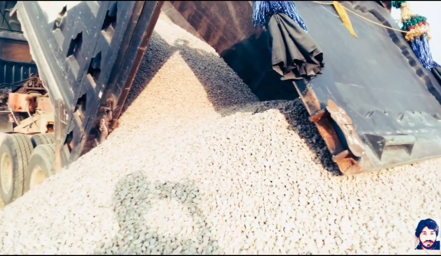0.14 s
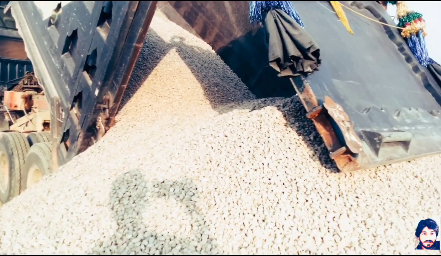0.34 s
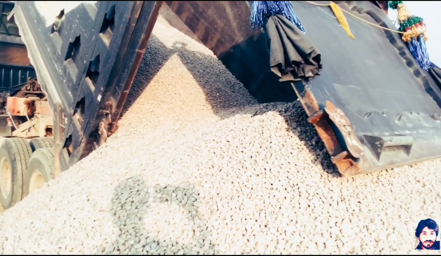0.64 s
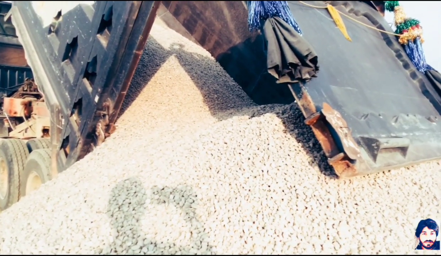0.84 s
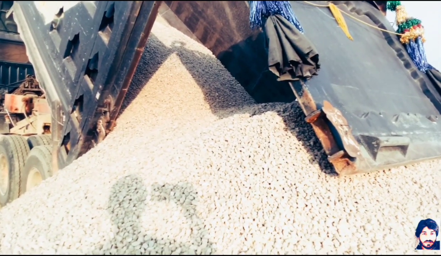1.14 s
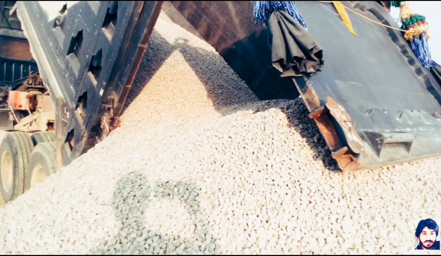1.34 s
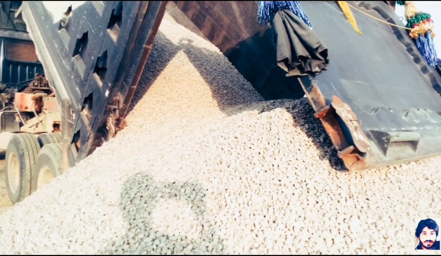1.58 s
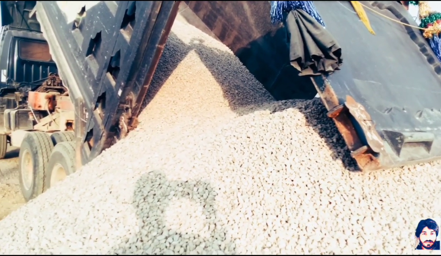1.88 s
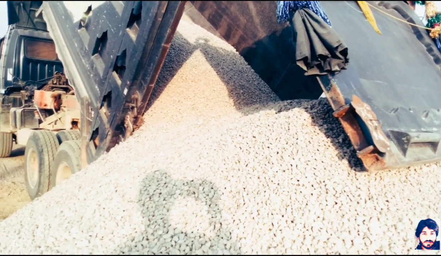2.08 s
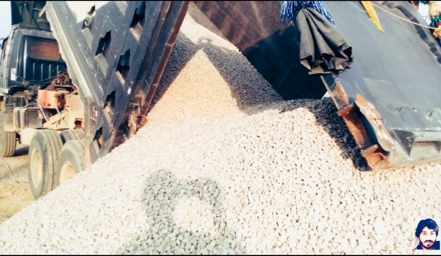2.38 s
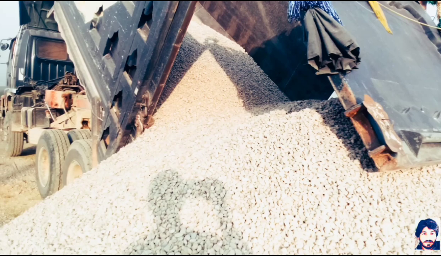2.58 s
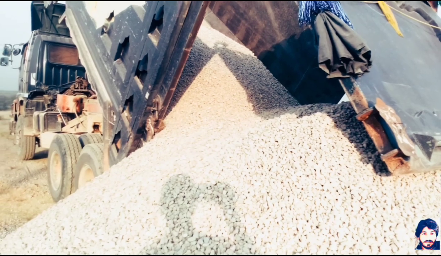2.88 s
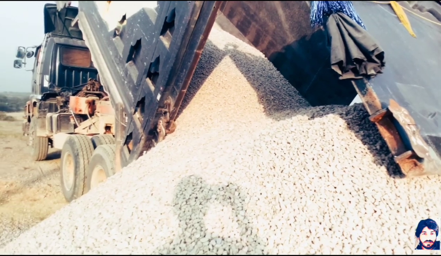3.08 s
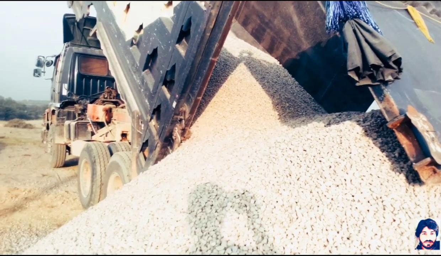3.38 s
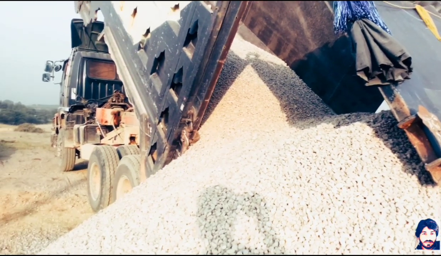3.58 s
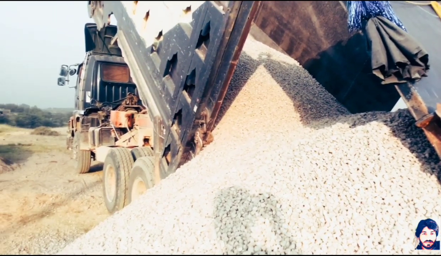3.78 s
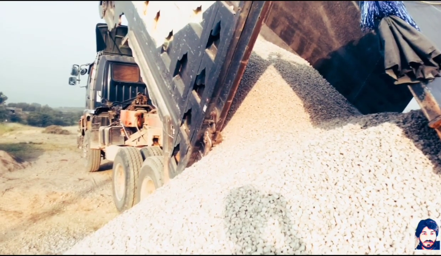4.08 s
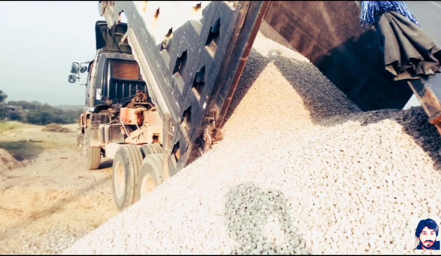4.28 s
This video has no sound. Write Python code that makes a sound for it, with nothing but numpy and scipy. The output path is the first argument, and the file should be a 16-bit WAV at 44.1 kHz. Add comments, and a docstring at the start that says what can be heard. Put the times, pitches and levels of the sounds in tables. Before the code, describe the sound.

From 0 s crushed stone is already running off a raised steel truck bed onto a heap, close and bright: countless tiny ringing grains over a fizzy hiss, with pebble clicks and sharp snaps. A nearby diesel idles throughout, its metallic knock repeating in an uneven pattern nearly four times a second, with quicker ticks between, soft exhaust puffs and a wavering low hum. The flow surges at about 0.2-0.7 s and again near 1.3 s, then thins somewhat. Small crackling slides burst often from 0.2 s. Loads drum on the hollow bed, strongly near 0.2, 1.3 and 2.65 s; brief squeaks chirp throughout, clustering after 4 s. Steel pings at 1.65, 2.25, clearest there, and 2.74 s. Stone dips near 3.85 s, then a crisp slide clicks at 4.06 s. The engine gradually weakens while the stone continues to the cut at about 4.4 s. Dry open air, little deep bass.

```python
"""Crushed stone trickles off a raised steel bed onto a pile in the open air, near an idling six-cylinder diesel.
From the start the contacts of the engine ring its block in a fixed pattern, over exhaust puffs and a low hum.
The stream is many tiny ringing grains over hiss; loads drum on the hollow bed, and stones squeak, snap and knock.
Small slides of stone, made of crackling noise, soon begin to swell and die.
Later a few single stones make the steel ping, while the engine knock slowly grows fainter."""
import sys
import numpy as np
from scipy import signal
from scipy.fft import rfft, irfft, next_fast_len
from scipy.io import wavfile

SR = 44100
rng = np.random.default_rng(int(sys.argv[2]) if len(sys.argv) > 2 else 0)


def field_ratio(decibels):
    """Amplitude ratio for a level in dB (20 dB per decade); scalars and array-likes work."""
    return 10 ** (np.asarray(decibels, dtype=float) / 20)


def waveform_to_disk(signal):
    """Save audio, clipped to [-1, 1], as 16-bit WAV at the path in sys.argv[1]."""
    frames = np.transpose(np.atleast_2d(signal))
    scaled = np.clip(frames, -1, 1) * 32767
    samples = np.round(scaled).astype(np.int16)
    wavfile.write(sys.argv[1], SR, samples)


N = 195451

# The flow of stone. Each row: time in seconds, strength in dB, extra grit in dB.
FLOW_CURVE = [(0, -2, 1), (.15, 3, 0), (.31, 2.5, 0), (.68, 1.5, 0), (1.08, -1.5, -1), (1.29, 3, -2),
              (1.5, 2, 0), (1.78, 1, 2), (2.04, -.5, 2), (2.4, -2, 0), (2.65, .5, -1), (2.95, -1, 0),
              (3.3, 0, 3), (3.5, 1, 0), (3.85, -4, -1), (4.1, 1.2, 1), (4.43, -1, 0)]
# How each part of the stone sound, and the bed under it, answers the flow.
# Each holds: level in dB, share of the strength, share of the grit, thinning in dB per second (below 0: growing).
BIG_STONES = (-44.9, .9, .01, .2)
SMALL_STONES = (-44, 1.1, -.3, .9)
FINE_STONES = (-35.8, .3, .4, .65)
FIZZ_STONES = (-57.5, .2, 1.1, .1)
NARROW_STONE_BAND = (-58, .3, .5, -2.9)   # stone sound near 7.5 kHz that grows as the microphone turns
BED_CLATTER = (-59.5, .5, .01, .9)
BED_BOOM = (-68.5, .8, -.5, -.2)
# Colour of the stone sound as the microphone hears it. Each row: frequency in Hz, gain in dB.
STONE_COLOUR = [(1400, -7.5), (2000, -16), (2500, -10), (3000, -6.5), (4200, -2), (5000, -3.5),
                (5800, -1.5), (6300, -8), (6630, -14.5), (6950, -7), (7600, -4), (9000, -9), (10500, -11),
                (12500, -20), (13900, -25), (14800, -6.5), (15400, -2)]
# Small slides, before the colour. Each row: start in seconds, rms level at the start in dB,
# centre in Hz, seconds to fall by 20 dB.
SLIDE_EVENTS = [(.2104, -28.5, 5470, .045), (.309, -34.5, 4360, .032), (.4208, -35, 5330, .24),
                (.512, -32.5, 4400, .032), (.5802, -26, 8100, .047), (.6536, -33, 4380, .08),
                (.7323, -32.5, 2900, .042), (.8043, -32.5, 5900, .07), (.9728, -34.5, 4100, .032),
                (1.0004, -36.5, 4760, .043), (1.1562, -29, 5330, .056), (1.1984, -34.5, 4950, .068),
                (1.3214, -30, 5070, .046), (1.6273, -38.5, 4160, .1), (1.7454, -37.5, 3900, .08),
                (1.8078, -35, 5370, .074), (2.0894, -27, 4900, .031), (2.2656, -26, 5140, .059),
                (2.4137, -32, 4840, .032), (2.5322, -35, 4200, .12), (2.583, -29.5, 7000, .027),
                (2.615, -35.5, 3960, .1), (2.6606, -32.5, 4160, .043), (2.7048, -34.5, 4030, .062),
                (2.86, -35, 2870, .1), (2.943, -36, 4500, .04), (3.1534, -31.5, 7060, .1),
                (3.16, -37, 3000, .08), (3.353, -33.5, 3970, .032), (3.3774, -30.5, 7300, .03),
                (3.5431, -39, 4400, .06), (3.719, -39, 4120, .24), (4.0604, -25, 4600, .03),
                (4.069, -30, 4200, .06), (4.3666, -33.5, 5200, .051)]
# Heavier loads landing on the hollow bed. Each row: time in seconds, clatter in dB, boom in dB.
LOAD_LANDINGS = [(.02, -62, -51), (.14, -58, -53), (.22, -47, -63), (.32, -48, -60), (.43, -55, -58),
                 (.48, -53, -60), (.62, -60, -55), (.76, -52, -54), (.83, -56, -64), (.94, -56, -62),
                 (1.02, -61, -60), (1.17, -57, -64), (1.27, -53, -60), (1.33, -47, -53), (1.43, -52, -56),
                 (1.57, -52, -62), (1.63, -53, -66), (1.76, -55, -64), (1.84, -55, -64), (2.01, -57, -66),
                 (2.08, -56, -62), (2.27, -55, -58), (2.62, -47, -58), (2.67, -46, -56), (2.75, -51, -55),
                 (2.81, -56, -62), (2.87, -56, -54), (2.95, -62, -58), (3.18, -50, -58), (3.37, -53, -68),
                 (3.43, -52, -60), (3.5, -57, -56), (3.57, -58, -66), (3.76, -60, -60), (4.05, -61, -57),
                 (4.2, -64, -56), (4.33, -66, -58)]
# Modes of the steel bed. Each row: frequency in Hz, relative level in dB, time to fall by 60 dB in seconds.
BED_MODES = [(1849, -5.5, .04), (2255, -1, 0.045), (2714, 0, 0.065), (2890, 2, 0.035)]
# Lone stones snapping. Each row: first touch in seconds, usual peak in dB.
SNAP_EVENTS = [(0.124, -28), (0.2133, -31), (0.2712, -32), (0.4453, -29), (0.58, -28), (0.5924, -25),
               (0.6513, -30), (0.7318, -31), (0.7845, -23), (0.8048, -31), (0.8208, -28), (.8965, -31),
               (0.9895, -28), (1.0025, -31), (1.065, -33), (1.1352, -29), (1.1548, -30), (1.24, -32),
               (1.46, -30), (1.7932, -29), (1.8396, -32), (2.2532, -27), (2.4208, -28), (2.562, -32),
               (2.7925, -24), (2.8001, -26), (2.8126, -32), (3.0658, -31), (3.1526, -30), (3.1995, -31),
               (3.3482, -32), (3.422, -32), (3.4529, -31), (3.6136, -27), (3.8146, -31), (4.0341, -30),
               (4.0606, -32), (4.0777, -28), (4.2541, -32), (4.3339, -26), (4.3464, -30), (4.3654, -31),
               (4.4013, -30)]
# Ringing of a chip of stone. Each row: frequency in Hz, relative level in dB, time to fall by 60 dB in seconds.
CHIP_MODES = [(6000, -9, .004), (7600, -2, .005), (8700, -1, .004), (10000, -3, .003), (12200, -8, .003)]
# Big stones knocking on the bed. Each row: time in seconds, rough peak in dB.
KNOCK_BLOWS = [(0.2124, -39), (0.3097, -35), (0.6469, -43), (0.7312, -39), (1.1199, -45), (1.276, -39),
               (1.3124, -38), (1.3833, -40), (1.6297, -38), (2.2543, -42), (2.6434, -32), (4.365, -42)]
# Dull thuds on the bed. Each row: time in seconds, rough peak in dB.
THUD_BLOWS = [(0.189, -55), (0.734, -52), (1.02, -49), (1.173, -53), (1.35, -45), (2.313, -51),
              (2.366, -53), (2.411, -56), (2.657, -46), (2.854, -50), (2.937, -50), (3.173, -50),
              (3.975, -54), (4.201, -52)]
# Ringing of a thud. Each row: frequency in Hz, relative level in dB, time to fall by 60 dB in seconds.
DULL_MODES = [(590, -4, .08), (690, -8, .06)]
# Pebbles clicking on the heap. Each row: time in seconds, rough peak in dB.
PEBBLE_BLOWS = [(0.2109, -28), (0.5127, -27), (0.5766, -30), (0.6539, -29), (0.7317, -26), (0.8056, -27),
                (0.8609, -30), (0.8809, -30), (0.9732, -33), (1.1204, -31), (1.1558, -25), (1.2635, -31),
                (1.3209, -28), (1.3823, -30), (1.5723, -32), (1.6282, -29), (1.7439, -31), (1.7943, -30),
                (2.0268, -34), (2.0892, -27), (2.2528, -27), (2.2707, -27), (2.4129, -32), (2.5331, -30),
                (2.582, -32), (2.6155, -30), (2.6604, -28), (2.7033, -32), (2.8609, -33), (2.9467, -34),
                (3.1467, -32), (3.252, -36), (3.3523, -33), (3.5428, -30), (3.7199, -32), (3.7928, -36),
                (4.0597, -25), (4.1415, -35), (4.2298, -34), (4.3655, -32)]
# Ringing of a pebble. Each row: frequency in Hz, relative level in dB, time to fall by 60 dB in seconds.
CLICK_MODES = [(3300, -2, .012), (4050, 0, .012), (4900, -1, .009), (5650, 0, .008)]
# Stones that strike one clear mode of the steel. Each row: time in seconds, rough peak in dB.
PING_EVENTS = [(1.645, -48), (2.2535, -30), (2.738, -42.5)]
# Stones squeaking along the steel. Each row: start in seconds, level in dB, first pitch in Hz,
# last pitch in Hz, length in seconds.
SQUEAK_EVENTS = [(0.043, -45, 4070, 4020, 0.027), (.246, -43, 4120, 4100, .03),
                 (0.308, -43, 4360, 4330, 0.043), (0.478, -44, 4340, 4320, 0.05),
                 (0.653, -44, 4370, 4370, .035), (0.855, -43, 4070, 4130, 0.04),
                 (.893, -44, 4330, 4380, .025), (.935, -47, 4050, 4020, .045),
                 (1.625, -39.5, 4100, 4290, 0.042), (1.745, -45, 3980, 3950, 0.016),
                 (1.807, -39, 5750, 5640, 0.014), (1.868, -43.5, 3680, 3980, .025),
                 (2.66, -43, 4000, 4150, .025), (2.705, -46.5, 3880, 3600, 0.022),
                 (2.943, -47, 4050, 4020, .025), (2.852, -51, 2750, 2900, .05),
                 (3.35, -45, 4100, 4080, .014), (3.372, -52, 2700, 2720, .07),
                 (3.437, -47, 4580, 3700, .06), (3.494, -49, 2700, 2740, 0.016),
                 (3.54, -48, 3680, 3800, 0.034), (4.058, -41, 3660, 3680, .022),
                 (4.095, -50, 3740, 3780, .05), (4.136, -42, 4120, 4110, 0.052),
                 (4.165, -50, 3680, 3640, .04), (4.19, -46, 4170, 4150, .048),
                 (4.226, -48, 3500, 3620, 0.05)]
# The idle speed hunts a little. Each row: time in seconds, engine cycles done, counted at the hardest knock.
ENGINE_TURNS = [(-.1469, -1), (.1225, 0), (.6606, 2), (1.7331, 6), (1.9995, 7), (3.3464, 12), (3.6137, 13),
                (4.6893, 17)]
# Ringing of the engine block. Each row: frequency in Hz, time to fall by 60 dB in seconds.
BLOCK_MODES = [(1026, 0.12), (1107, 0.041), (1181, 0.046), (1258.3, 0.071), (406.4, 0.037), (598.8, 0.12),
               (1568, 0.11), (950, .05)]
# Contacts in one cycle. Each row: share of the cycle, dB into each of the first four modes of the block
# (four columns), dB into every other mode. All are relative to the knock level.
CYCLE_CONTACTS = [(-.0071, -7.5, -4, -3, -1, -30), (.0197, -35, -30, -1, -9, -30),
                  (.0364, -15, -35, -14, -12, -23), (.148, -30, -18, -14, -6, -24.5),
                  (.195, -25, -12, -13, -12, -24), (.247, -17, -17, -15, -7.5, -30),
                  (.315, -14, -22, -22, -8, -30), (.352, -15, -9, -11, -4, -18),
                  (.405, -30, -12, -12, -16, -30), (.4933, -30, -7, -30, -7, -28.5),
                  (.53, -15, -9, 2.5, -14, -22), (.5632, -18, -8, -12, -13, -30),
                  (0.645, -17, -18, -14, -10.5, -28), (.695, -28, -14, -17, -20, -40),
                  (.735, -30, -30, -22, -13, -40), (0.855, -26, -45, -20, -11, -44.5)]
# Rattle of gears in each mode of the block, before it follows the shaking: one level in dB per mode.
GEAR_RATTLE_DB = [-67, -64, -63.5, -53.5, -69.5, -69.5, -65, -65]
# Direction in which each mode swings: one sign per mode.
MODE_SIGNS = [1, -1, -1, 1, 1, 1, 1, 1]
# Exhaust puff of each cylinder. Each row: share of the cycle, usual drive in dB.
CYLINDER_PUFFS = [(0.06, -57), (.22, -56), (0.41, -57), (0.56, -46), (0.725, -48.5), (.9, -57)]
# Spectrum of the engine rumble. Each row: frequency in Hz, relative level in dB per Hz.
RUMBLE_SPECTRUM = [(30, -10), (60, -11), (105, -4), (150, -5), (240, -8.5), (330, -10), (420, -15),
                   (640, -21), (790, -18), (930, -10), (1350, -7), (1800, -17.5), (2400, -42), (4000, -62)]
# The hum swells briefly. Each row: time in seconds, peak of the added hum in dB.
HUM_HUMPS = [(.04, -57), (.3, -58), (.37, -54), (.47, -56), (.6, -60), (.8, -60), (1.08, -58), (1.14, -57),
             (1.45, -60), (1.6, -54), (1.75, -59), (1.87, -52), (2.07, -54), (2.17, -54), (2.58, -58),
             (2.73, -61), (2.84, -61), (3.0, -55), (3.27, -55), (3.8, -59), (4.07, -60)]


def rms_one(x):
    """Scale a sound to an rms of 1."""
    return x / np.sqrt(np.mean(x ** 2) + 1e-20)


def band(x, low_hz, high_hz, order=2):
    """Keep only the sound between two frequencies."""
    return signal.sosfilt(signal.butter(order, [low_hz, high_hz], "band", fs=SR, output="sos"), x + 1e-18)


def ring(clicks, hz, t60):
    """A two-pole resonator: a unit click starts a dying sine of height about 1."""
    r = field_ratio(-60 / (t60 * SR))
    w = 2 * np.pi * hz / SR
    return signal.lfilter([0, np.sin(w)], [1, -2 * r * np.cos(w), r * r], clicks + 1e-18)


def coloured(x, points):
    """Filter a sound with the gains of a table, joined along log frequency."""
    size = next_fast_len(N)
    hz, db = np.transpose(points)
    bin_hz = np.arange(size // 2 + 1) * SR / size
    gain = field_ratio(np.interp(np.log(bin_hz + 1), np.log(hz), db))
    return irfft(rfft(x, size) * gain, size)[:N]


def drift(rate):
    """A slow random wander of rms about 1: noise smoothed by two equal poles at rate Hz."""
    r = np.exp(-40 * np.pi * rate / SR)   # computed at every 20th sample
    noise = rng.standard_normal(N // 20 + 2002)
    slow = signal.lfilter([1], [1, -2 * r, r * r], noise)[2000:]
    return np.interp(np.arange(N) / 20, np.arange(len(slow)), rms_one(slow))


def swells(s, db, rise_s, fall_s):
    """Power of humps that build up to their peak and die away exponentially."""
    late = np.arange(0, N, 32)[:, None] / SR - np.array(s)   # computed at every 32nd sample
    distance = np.where(late < 0, -late / rise_s, late / fall_s)
    power = (field_ratio(2 * np.array(db)) * np.exp(-2 * distance)).sum(axis=1)
    return np.interp(np.arange(N) / 32, np.arange(len(power)), power)


def clumps(spread_db):
    """Stones arrive in handfuls: a rate that wanders slowly and quickly at once."""
    return field_ratio(spread_db * (.7 * drift(11) + 0.87 * drift(60)))


def carried(db, strength_share, grit_share, thinning_db_per_s):
    """Level in dB of one part of the stone sound, as the flow carries it."""
    t = np.arange(N) / SR
    s, strength, grit = np.transpose(FLOW_CURVE)
    strength_db, grit_db = np.interp(t, s, strength), np.interp(t, s, grit)
    return db + strength_share * strength_db + grit_share * grit_db - thinning_db_per_s * t


def grains(low_hz, high_hz, per_s, cycles, size_db, clump, patch_db, hiss):
    """Clumped stone knocks ring for some cycles in ten bands of pitch, over the hiss of far ones."""
    sizes = field_ratio(size_db * np.minimum(rng.exponential(1, N), 4)) * rng.choice([-1, 1], N)
    born = rng.random(N) < per_s * clump / SR
    dealt = rng.integers(0, 10, N)   # which band each knock falls in
    far = rng.standard_normal((2, N)) * np.sqrt(clump)
    edges = np.geomspace(low_hz, high_hz, num=11)
    out = 0
    for k, (low, high) in enumerate(zip(edges, edges[1:])):
        hz = np.sqrt(low * high)
        near = rms_one(ring(sizes * born * (dealt == k), hz, cycles / hz))
        distant = hiss * rms_one(band(far[k % 2], low, high))
        patch = field_ratio(patch_db * drift(13.5)) * np.sqrt(hz)   # each size of stone comes and goes
        out = out + patch * (near + distant)
    return rms_one(band(out, low_hz / 1.05, high_hz * 1.05, order=3))


def flow():
    """Each size of stone has its own range of pitch; sizes that fall together share their clumps."""
    heavy, light = clumps(2.6), clumps(2.1)
    mixed, finest = np.sqrt(heavy * light), light * clumps(1.8)
    big = field_ratio(carried(*BIG_STONES)) * grains(2650, 4650, 1100, 34.0, 3.6, heavy, 2.3, 1.0)
    small = field_ratio(carried(*SMALL_STONES)) * grains(4752, 6590, 2500, 27.0, 3.8, mixed, 1.75, 1.1)
    fine = field_ratio(carried(*FINE_STONES)) * grains(6010, 15000, 4500, 30.0, 5.2, light, 1.4, 1.0)
    fizz = field_ratio(carried(*FIZZ_STONES)) * grains(14300, 16160, 2700, 34.0, 2.7, finest, 0.73, .6)
    narrow = field_ratio(carried(*NARROW_STONE_BAND)) * grains(7000, 7900, 1500, 40.0, 4.0, light, 1.5, .8)
    surge = field_ratio(0.9 * drift(30))   # short surges move the whole stream
    return (big + small + fine + fizz + narrow) * surge


def ticks(per_s=200, level_db=-49.5):
    """Near stones click: short random impulses over a wide band of treble, in clumps."""
    sizes = field_ratio(4.5 * np.minimum(rng.exponential(1, N), 4)) * rng.choice([-1, 1], N)
    clicks = sizes * (rng.random(N) < per_s * clumps(4.5) / SR)
    return field_ratio(level_db) * rms_one(band(clicks, 3600, 15800))


def slides(octaves=0.7, rise_s=0.0015):
    """A handful of stones lets go: a dense crackle of noise that swells fast and thins out."""
    out = np.zeros(N)
    t = np.arange(int(SR / 4)) / SR
    for s, db, hz, dying_s in SLIDE_EVENTS:
        sizes = field_ratio(2.5 * np.minimum(rng.exponential(1, len(t)), 4))
        crackle = rng.standard_normal(len(t)) * sizes
        shape = (1 - np.exp(-t / rise_s)) * field_ratio(-20 * t / dying_s)
        high_hz = min(hz * 2 ** octaves, 16000)
        burst = rms_one(band(crackle, hz * 2 ** -octaves, high_hz)) * shape
        at = int((s - .002) * SR)
        out[at:at + len(t)] += field_ratio(db) * burst[:N - at]
    return out


def drumming():
    """Stones land on the hollow bed: a clatter, a duller boom, and a few modes of the steel that come and go."""
    s, clatter_db, boom_db = np.transpose(LOAD_LANDINGS)
    rise_s, fall_s = .025, .04
    clatter_power = field_ratio(2 * carried(*BED_CLATTER)) + swells(s, clatter_db, rise_s, fall_s)
    boom_power = field_ratio(2 * carried(*BED_BOOM)) + swells(s, boom_db, rise_s, fall_s)
    clump = clumps(1.7)
    clatter = grains(1400, 2500, 3000, 25.0, 2.5, clump, 2.0, 1.5)
    boom = grains(380, 800, 1500, 20.0, 2.5, clump, 2.0, 1.5)
    singing = 0
    for hz, db, t60 in BED_MODES:
        wander_db = 4 * drift(8)
        singing = singing + field_ratio(db + wander_db) * rms_one(ring(rng.standard_normal(N), hz, t60))
    top = rms_one(coloured(clatter, STONE_COLOUR)) + field_ratio(-9.5) * singing
    return np.sqrt(clatter_power) * top + np.sqrt(boom_power) * boom


def chip_mode(clicks, hz, mode_db, t60):
    """One mode of a stone chip, driven by clicks narrowed to its own band."""
    return field_ratio(mode_db) * ring(band(clicks, hz / 1.2, hz * 1.2), hz, t60)


def snaps(per_s=35, small_db=-47):
    """A small hard stone cracks and rings for a few milliseconds; fainter ones come at random."""
    s, db = np.transpose(SNAP_EVENTS)
    crack_at = ((s + .0014) * SR).astype(int)   # 1.4 ms from first touch to the crack
    faint = rng.random(N) < per_s * clumps(4.0) / SR
    faint_db = small_db + 3.5 * np.minimum(rng.exponential(1, N), 3)
    out, one = 0, 0
    for mode in CHIP_MODES:
        clicks = faint * field_ratio(faint_db + 4 * rng.standard_normal(N))
        clicks[crack_at] = field_ratio(db + 2.5 * rng.standard_normal(len(s)))
        out = out + chip_mode(clicks, *mode)
        one = one + chip_mode(np.eye(1, 200)[0], *mode)
    return out / np.abs(one).max()   # a single unit snap would peak at 1


def struck(blows, modes, loss_db, spread_db, wide):
    """Single blows ring a set of modes, each with a strength of its own; a narrower drive is a softer blow."""
    s, db = np.transpose(blows)
    chance = rng.standard_normal((len(s), len(modes)))
    out = np.zeros(N)
    for k, (hz, mode_db, t60) in enumerate(modes):
        clicks = np.zeros(N)
        clicks[(s * SR).astype(int)] = field_ratio(db + mode_db - loss_db + spread_db * chance[:, k])
        out += ring(band(clicks, hz / wide, hz * wide), hz, t60)
    return out


def single_blows():
    """Big stones knock or thud on the bed and pebbles click on the heap, each blow ringing its modes."""
    knocks = struck(KNOCK_BLOWS, BED_MODES, loss_db=6.5, spread_db=1.5, wide=1.25)
    thuds = struck(THUD_BLOWS, DULL_MODES, loss_db=3.0, spread_db=1.5, wide=1.07)
    pebbles = struck(PEBBLE_BLOWS, CLICK_MODES, loss_db=10.5, spread_db=3.5, wide=1.2)
    return knocks + thuds + pebbles


def pings(hz=7926, t60=0.19):
    """A hard stone strikes the steel and one high mode rings clear."""
    clicks = np.zeros(N)
    for s, db in PING_EVENTS:
        clicks[int(s * SR)] = field_ratio(db)
    return ring(clicks, hz, t60) * field_ratio(1.0 * drift(80))


def squeaks():
    """Stick and slip: a sliding tone whose strength and pitch stutter every few milliseconds."""
    out, wobble, stutter = np.zeros(N), drift(133), drift(220)
    for s, db, first_hz, last_hz, length_s in SQUEAK_EVENTS:
        at = int(s * SR) + np.arange(int(length_s * SR))
        along = np.linspace(0, 1, len(at))
        glide = abs(np.log(last_hz / first_hz))   # a stone that changes speed judders more
        hz = first_hz + (last_hz - first_hz) * along
        hz = hz * (1 + (.008 + .12 * glide) * wobble[at])
        grip = 1 + (.55 + 2.0 * glide) * stutter[at]
        shape = np.minimum(along * 8, 1) * np.minimum((1 - along) * 4, 1)
        out[at] += field_ratio(db) * shape * grip * np.sin(2 * np.pi * np.cumsum(hz) / SR)
    return out


def cycle_starts():
    """Time in seconds of every hardest knock, one per engine cycle."""
    s, done = np.transpose(ENGINE_TURNS)
    return np.interp(np.arange(done[0], done[-1] + 1), done, s)


def each_cycle(share, gains, jitter_s):
    """A click at the same place of every engine cycle, give or take the jitter."""
    s = cycle_starts()
    at = ((s[:-1] + share * np.diff(s) + jitter_s) * SR).astype(int)
    heard = (at >= 0) & (at < N)
    clicks = np.zeros(N)
    clicks[at[heard]] = gains[heard]
    return clicks


def engine_block(spread_db=1.3):
    """Injection and valve contacts ring the block; loose parts rattle on after each contact."""
    # the knock grows fainter as the microphone turns, by 0.9 dB per second
    blow_db = -36.2 - .9 * cycle_starts()[:-1]
    strikes = np.zeros((len(BLOCK_MODES), N))
    # contacts of one cylinder come early or late together
    late_s = .0005 * rng.standard_normal((6, len(blow_db)))
    for share, *mode_db in CYCLE_CONTACTS:
        jitter_s = late_s[int((share + .05) * 6)]
        for k in range(len(BLOCK_MODES)):
            into_db = mode_db[min(k, len(mode_db) - 1)]
            db = blow_db + into_db + spread_db * rng.standard_normal(len(blow_db))
            strikes[k] += each_cycle(share, field_ratio(db), jitter_s)
    fade = field_ratio(-60 / (.25 * SR))   # the shaking falls by 60 dB in 0.25 s
    shaken = .35 + 0.6 * rms_one(signal.lfilter([1], [1, -fade], np.sqrt(strikes.sum(axis=0))))
    out = np.zeros(N)
    for k, (hz, t60) in enumerate(BLOCK_MODES):
        drive = band(strikes[k], hz / 1.365, hz * 1.41) * 1.07
        out += ring(drive, hz, t60) * MODE_SIGNS[k]
        noise = band(rng.standard_normal(N), hz / 1.18, hz * 1.146)
        out += field_ratio(GEAR_RATTLE_DB[k]) * shaken * rms_one(ring(noise, hz, 0.41 * t60))
    return out


def puffs(pipe_hz=78, t60=0.04):
    """Each cylinder sends one dull puff per cycle, ringing two low resonances."""
    count = len(cycle_starts()) - 1
    clicks = 0
    for share, db in CYLINDER_PUFFS:
        clicks = clicks + each_cycle(share, -field_ratio(db + 2.5 * rng.standard_normal(count)), 0)
    low = 1.3 * ring(band(clicks, 45, 170), pipe_hz, t60)
    return low + 0.5 * ring(band(clicks, 90, 220), 135, 0.06)


def hum(steady_db=-74, hz=151, wander_hz=6):
    """A low sine wanders in pitch and wavers in level, swelling briefly."""
    s, db = np.transpose(HUM_HUMPS)
    level = np.sqrt(field_ratio(2 * steady_db) + swells(s, db, rise_s=.028, fall_s=.04))
    tone = np.sin(2 * np.pi * np.cumsum(hz + wander_hz * drift(10)) / SR)
    return level * rms_one(tone) * field_ratio(1.5 * drift(20))


def rumble(level_db=-53, fade_db_per_s=.5):
    """Broad engine rumble: coloured noise that wanders in level and slowly fades."""
    db = level_db - fade_db_per_s * np.arange(N) / SR + 2.3 * drift(8)
    return field_ratio(db) * rms_one(coloured(rng.standard_normal(N), RUMBLE_SPECTRUM))


def scene():
    """Stone and engine added together, dry as in the open, with no echo."""
    stream = coloured(flow() + ticks() + slides(), STONE_COLOUR)
    stone = stream + drumming() + snaps() + single_blows() + pings() + squeaks()
    engine = engine_block() + puffs() + hum() + rumble()
    return (stone + engine)[None]


def top_cut(x):
    """Nothing passes above the cut-off."""
    return signal.sosfilt(signal.butter(12, 15950, fs=SR, output="sos"), x)


def record(dry):
    """The microphone drops the deep bass, peaks are rounded, and the top is cut steeply."""
    x = signal.sosfilt(signal.butter(3, 65, "high", fs=SR, output="sos"), dry)
    x = .085 * np.tanh(x / .085)
    mix = signal.sosfilt(signal.ellip(12, .5, 34, 15430, fs=SR, output="sos"), x)
    return top_cut(mix)


dry = scene()
out = record(dry)
waveform_to_disk(out)
```